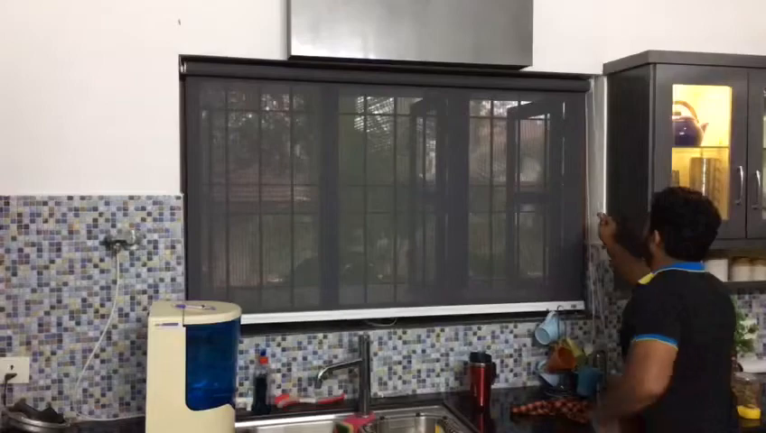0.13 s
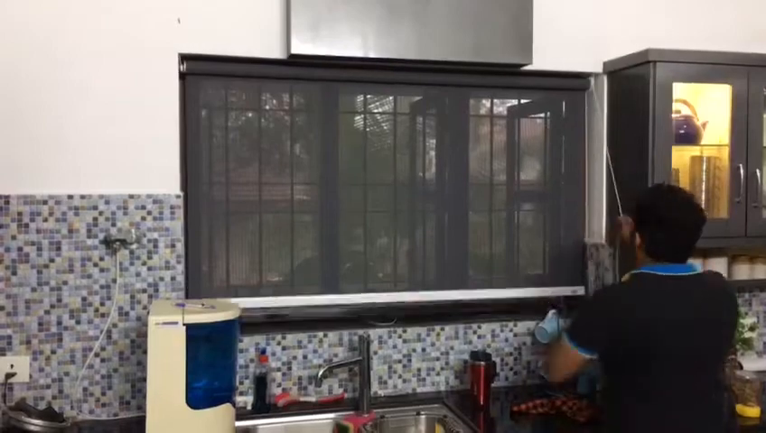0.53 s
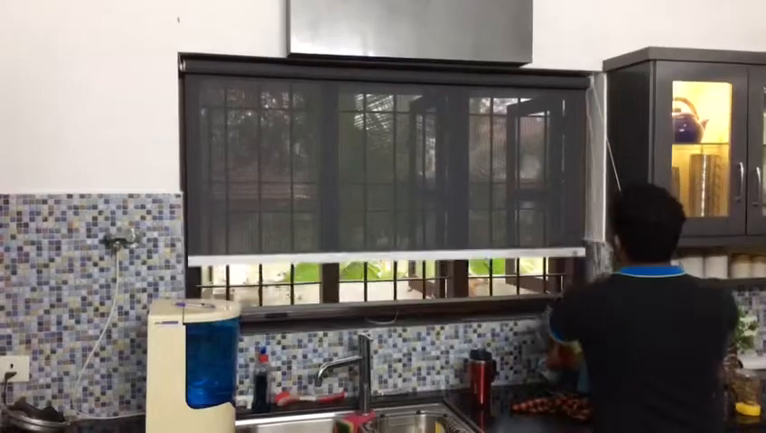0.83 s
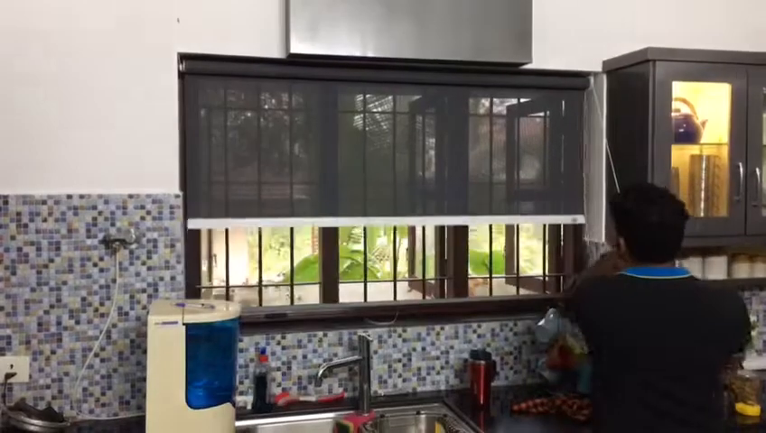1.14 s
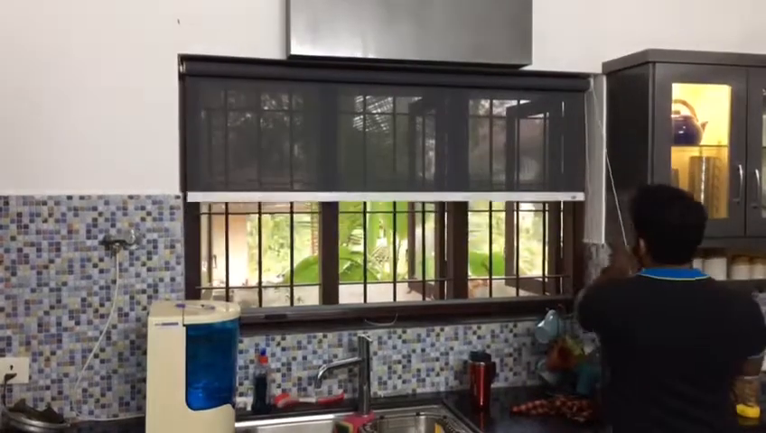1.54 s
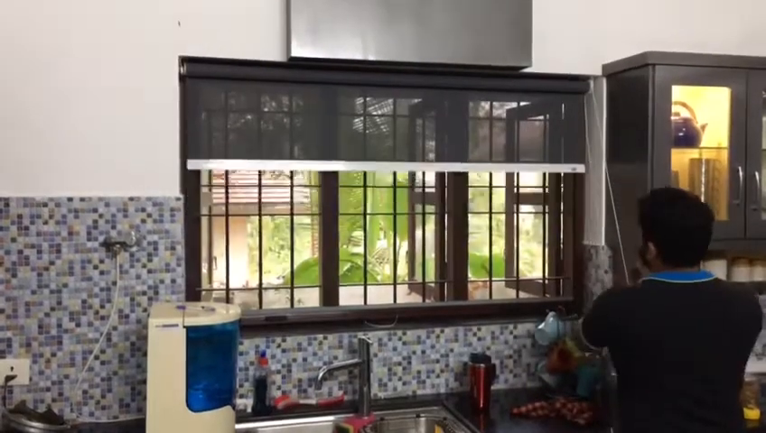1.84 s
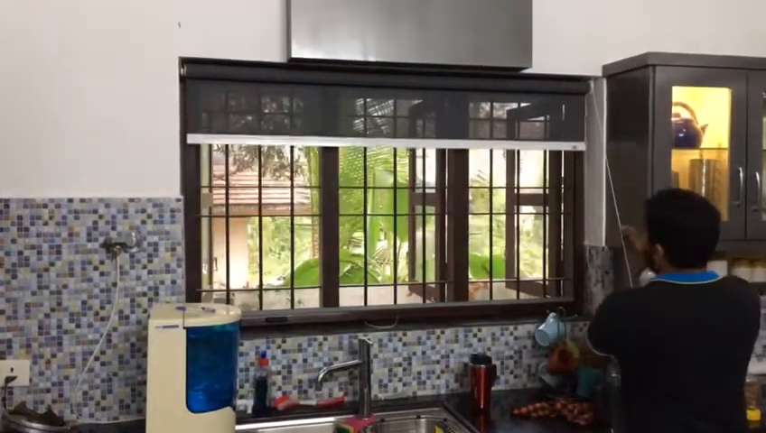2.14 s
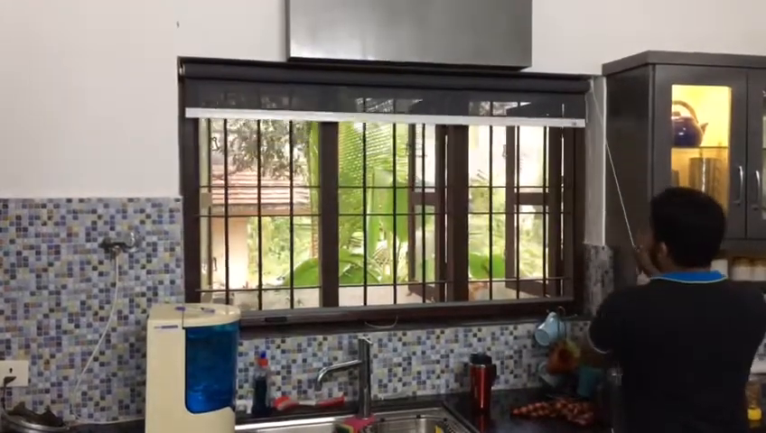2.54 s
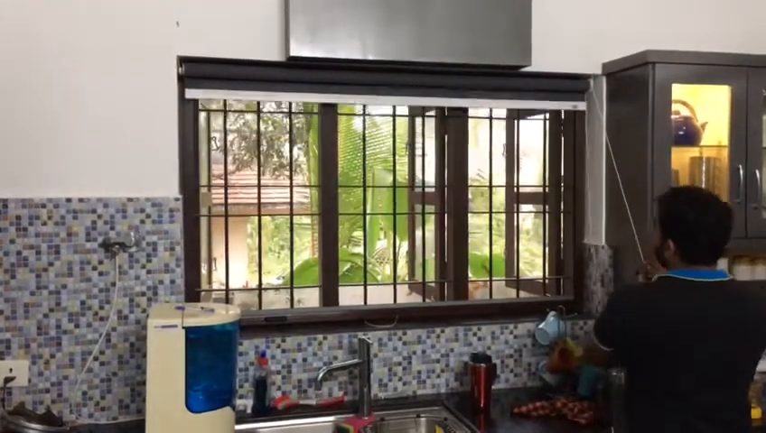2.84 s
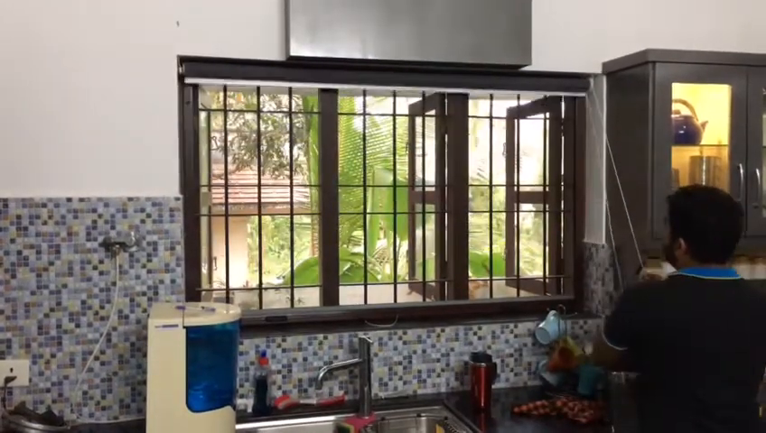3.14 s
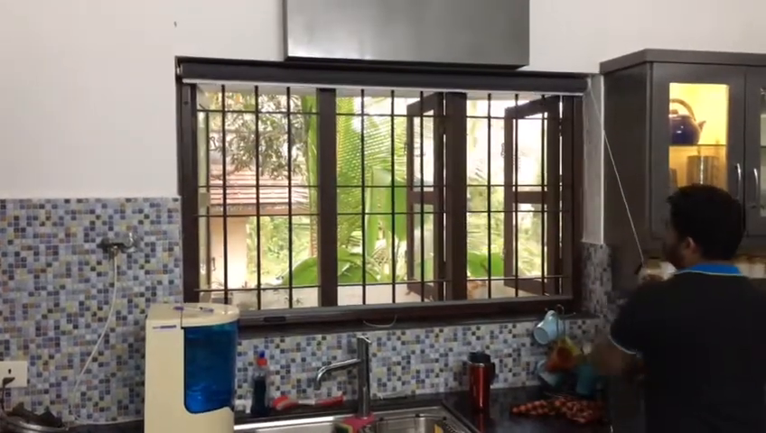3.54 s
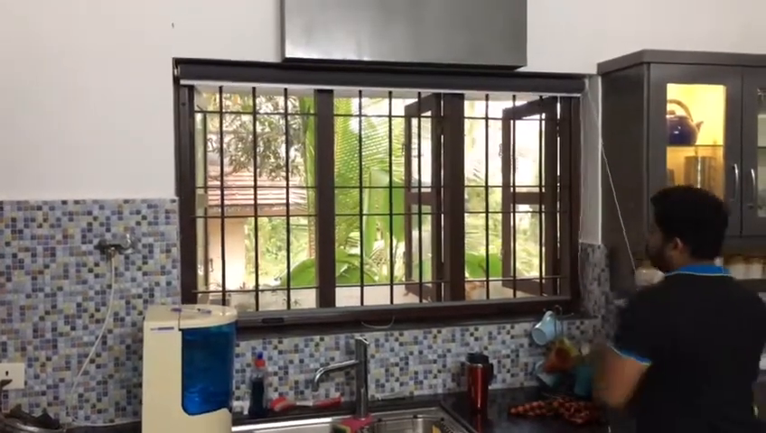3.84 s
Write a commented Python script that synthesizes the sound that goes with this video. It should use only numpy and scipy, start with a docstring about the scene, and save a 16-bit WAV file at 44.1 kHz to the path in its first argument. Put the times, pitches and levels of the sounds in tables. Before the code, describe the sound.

Heard from across an echoing kitchen, a roller blind rises in several pulls with soft rubbing and bead rattles over a steady fan hum. It stops with a sharp, ringing knock, and the loose chain slaps the tiles.

```python
"""A tiled kitchen, one microphone across the room from the window. A fan hums throughout. A roller blind is
hauled up by its bead chain: the roller rubs at each pull and the chain squeaks once, while the beads rattle in
bursts. At 3.2 s the bottom bar knocks against the housing and rings. Half a second later the slack chain swings
into the wall and clinks on a fitting. The hard room rings on behind the knocks and rattles."""
import sys
import numpy as np
from scipy import signal
from scipy.fft import rfft, irfft
from scipy.io import wavfile

SR = 44100
rng = np.random.default_rng(int(sys.argv[2]) if len(sys.argv) > 2 else 0)


def wrap_up_sound(samples):
    """Save the sound to the file named by the first command line argument, as 16-bit audio."""
    columns = np.atleast_2d(samples).T
    # keep every value between -1 and 1, then stretch to whole-number steps
    tamed = np.clip(columns, -1, 1)
    steps = np.round(tamed * 32767).astype(np.int16)
    wavfile.write(sys.argv[1], SR, steps)


N = 176400


def amp(db):
    """Decibels to gain."""
    return 10 ** (np.asarray(db) / 20)


def unit(x):
    """Scale to the energy of one second at full level."""
    return x * np.sqrt(SR / (np.sum(x ** 2) + 1e-18))


def lookup(points, n):
    """A table over log frequency, read at the bins of n samples."""
    hz, value = np.array(points).T
    return np.interp(np.log(np.fft.rfftfreq(n, 1 / SR) + 1), np.log(hz), value)


def through(x, response):
    """Play a sound through a response."""
    return signal.fftconvolve(x, response)[:len(x)]


def colour(x, spectrum, tilt_db=0):
    """Causal filter with the given spectrum, tilted by dB per octave above 500 Hz."""
    half = SR // 2
    octaves = np.log2(np.maximum(np.fft.rfftfreq(SR, 1 / SR), 500) / 500)
    cepstrum = irfft(np.log(amp(lookup(spectrum, SR) + tilt_db * octaves)))
    cepstrum[1:half] *= 2  # fold to minimum phase
    cepstrum[half + 1:] = 0
    return through(x, irfft(np.exp(rfft(cepstrum)))[:half])


def fade(t60):
    """One second of exponential decay."""
    return np.exp(-np.log(1000) * np.arange(SR) / SR / t60)


def burst(t60):
    """Noise that starts at once and dies away."""
    return rng.standard_normal(SR) * fade(t60)


def swell(s, half_width_s):
    """A smooth rise and fall around a moment."""
    return np.exp(-.5 * ((np.arange(N) / SR - s) / half_width_s) ** 2)


def ring(modes):
    """Struck modes, dying away."""
    t = np.arange(SR) / SR
    return unit(sum(amp(db) * fade(t60) * np.sin(2 * np.pi * (hz * t + rng.random()))
                    for hz, db, t60 in modes))


def tone(hz, wander_hz, steps):
    """A sine whose pitch wanders through a number of random steps."""
    wander = np.interp(np.linspace(0, 1, N), np.linspace(0, 1, steps), rng.standard_normal(steps))
    return np.sqrt(2) * np.sin(2 * np.pi * np.cumsum(hz + wander_hz * wander) / SR)


def contacts(n, per_s, scatter_db=0):
    """Impulses at random moments, their strength spread by scatter_db."""
    hits = rng.random(n) < per_s / SR
    strength = amp(scatter_db * rng.standard_normal(n).clip(-2, 2))
    return hits * strength * rng.choice([-1, 1], n)


def add(out, s, x):
    """Mix a sound in at a time."""
    i = int(s * SR)
    out[i:i + len(x)] += x[:max(N - i, 0)]


# Reverberation of the tiled room: band_hz, t60_s
KITCHEN_DECAY = [(250, 0.63), (700, 0.65), (1400, 0.7), (2300, 0.66), (4000, 0.63), (7000, 0.61),
                 (12000, 0.4)]

def kitchen(build_s=.003, direct_db=-7.5):
    """From one spot to the microphone: direct sound, then a dense tail whose treble dies first."""
    noise = rfft(rng.standard_normal(SR))
    tail = np.zeros(SR)
    for hz, t60 in KITCHEN_DECAY:
        band = lookup([(f, float(f == hz)) for f, _ in KITCHEN_DECAY], SR)
        tail += irfft(noise * band, SR) * fade(t60)
    tail *= 1 - np.exp(-np.arange(SR) / SR / build_s)
    tail /= np.linalg.norm(tail)
    tail[0] += amp(direct_db)
    return tail


def window_recess(early_db=-7):
    """From the window recess to the microphone: its quick reflections, plus the kitchen."""
    early = burst(t60=.044)
    both = kitchen() + amp(early_db) * early / np.linalg.norm(early)
    return both / np.linalg.norm(both)


# Room tone, the fan's moving air: freq_hz, density_db
AIR_SPECTRUM = [(20, -22), (35, -23), (45, 2), (58, -8.5), (70, -7), (86, -15), (100, 1.5), (160, 1),
                (280, 4), (370, 2), (470, -3.5), (620, -2.5), (1000, -2.5), (1500, -7.5), (2200, -13.5),
                (3200, -20.5), (4300, -22.5), (6000, -29.5), (9000, -32.5), (12000, -41)]
# The fan's hum lines: pitch_hz, level_db
HUM_LINES = [(55.5, -63), (199.2, -62.5), (300.5, -60.5), (445, -73.5), (608.3, -65.5)]

def fan(air_db=-48.5):
    """Steady rush of air with slightly wandering hum lines."""
    air = colour(rng.standard_normal(N), AIR_SPECTRUM)
    hum = sum(amp(db) * tone(hz, wander_hz=1.32, steps=24) for hz, db in HUM_LINES)
    return amp(air_db) * unit(air) * np.sqrt(N / SR) + hum


# Light ticks of the gear and bar: start_s, level_db
GEAR_TICKS = [(0.153, -87), (1.141, -73), (1.966, -67), (3.111, -65), (3.152, -67.5)]
# One plastic tick: freq_hz, density_db
TICK_SPECTRUM = [(500, 12.5), (1200, -2), (2400, 8), (4200, -2.5), (7000, -5), (12000, -27)]

def ticks():
    """Single light plastic contacts, over in the window recess."""
    out = np.zeros(N)
    tick = unit(colour(window_recess(), TICK_SPECTRUM))
    for s, db in GEAR_TICKS:
        add(out, s, amp(db) * tick)
    return out


# Pulls that turn the roller: middle_s, half_width_s, level_db
ROLLER_PULLS = [(0.578, 0.0097, -48.5), (0.856, 0.017, -49.5), (1.0, 0.079, -62), (1.154, 0.026, -49.5),
                (1.374, 0.099, -62), (1.64, 0.034, -52.5), (1.88, 0.026, -57), (1.983, 0.015, -48.5),
                (2.266, 0.036, -59), (2.477, 0.088, -57.5), (2.737, 0.11, -63), (3.146, 0.033, -45)]
# The tube rubbing in its brackets: freq_hz, density_db
RUB_SPECTRUM = [(300, -23.5), (700, 1), (1200, 6.5), (1700, -2), (2400, -7), (4000, -14.5), (7000, -39.5),
                (12000, -20)]

def roller(squeak_db=-76):
    """The tube rubs in its brackets, swelling with each pull, and the chain squeaks faintly once."""
    effort = sum(amp(db) * swell(s, half_width) for s, half_width, db in ROLLER_PULLS)
    rub = colour(contacts(N, per_s=410), RUB_SPECTRUM)
    squeak = amp(squeak_db) * swell(s=1.32, half_width_s=.06) * tone(hz=3760, wander_hz=88, steps=300)
    return through(rub / rub.std() * effort, window_recess()) + squeak


def rattle(rows, spectrum):
    """Bursts of colliding beads, each reaching the microphone from its own spot along the chain."""
    out, t = np.zeros(N), np.arange(SR) / SR
    for s, length, db, fall_db, tilt_db in rows:
        envelope = (t < length) * amp(-fall_db * np.minimum(t / length, 1))
        hits = contacts(SR, per_s=380, scatter_db=2.5) * envelope
        hits[0] = 1  # every burst opens on a hit
        add(out, s, amp(db) * unit(colour(through(hits, kitchen()), spectrum, tilt_db)))
    return out


# Rattles of the running chain: start_s, length_s, level_db, fall_db, tilt_db_per_octave
CHAIN_RATTLES = [(0.425, 0.11, -86, 0, -4), (0.504, 0.015, -63.5, -11, -4), (.54, 0.14, -61.5, 0, -4.5),
                 (0.821, 0.015, -71, 19, -8), (0.881, 0.39, -72.5, 13, -4), (1.549, .2, -76.5, -4, -11),
                 (1.7727, 0.031, -50, 7, -1), (1.799, 0.061, -65.5, -8, -11.5)]
# Single bead clicks: start_s, level_db
LONE_CLICKS = [(.331, -91), (2.184, -76.5), (2.601, -86)]
# Colliding beads: freq_hz, density_db
BEAD_SPECTRUM = [(800, -51.5), (1800, -12), (2600, -9.5), (3000, -2.5), (4100, -2), (4550, 5.5),
                 (5300, 4.5), (6100, 8.5), (7200, 5.5), (8000, 3.5), (9700, 6), (12000, 2)]

def running_chain():
    """The beads rattle as the chain is hauled, and a few click alone."""
    out = rattle(CHAIN_RATTLES, BEAD_SPECTRUM)
    for s, db in LONE_CLICKS:
        add(out, s, amp(db) * unit(colour(burst(t60=.16), BEAD_SPECTRUM)))
    return out


# Slaps on the wall: start_s, length_s, level_db, fall_db, tilt_db_per_octave
WALL_SLAPS = [(3.75, 0.024, -42, 5, 1.5), (3.78, 0.049, -66, 5, -9), (3.912, 0.019, -59, -3, -2),
              (3.95, 0.048, -61, 2, -1)]
# Beads on tile: freq_hz, density_db
TILE_SPECTRUM = [(800, -32), (1800, -12), (2600, -9), (3400, -5.5), (3800, -9.5), (4300, 1), (5000, -4.5),
                 (5800, 0.5), (6900, -1), (7800, -3), (9600, 3), (10400, 1.5), (11400, -1.5), (12000, -0.5)]
# The chain striking a fitting by the wall: start_s, level_db
FITTING_CLINKS = [(3.7502, -55)]
# Modes of that fitting: pitch_hz, relative_db, t60_s
FITTING_MODES = [(3434, -3, 0.37), (4180, -18, 0.39), (4310, -14.5, 0.62), (5500, -13, 0.28),
                 (5830, -18, 0.29), (6406, -14, 1), (6860, -6.5, 0.29), (7779, -12, 0.3)]

def slack_chain():
    """The loose chain slaps the tiles and sets a fitting ringing."""
    out = rattle(WALL_SLAPS, TILE_SPECTRUM)
    for s, db in FITTING_CLINKS:
        add(out, s, amp(db) * ring(FITTING_MODES))
    return out


# Blows of the bottom bar: start_s, level_db, tilt_db_per_octave
BAR_BLOWS = [(3.2115, -39.5, 1), (3.215, -35, 1), (3.2198, -37, 1), (3.2335, -49, -4)]
# Dense ring of bar and housing: freq_hz, density_db
BAR_SPECTRUM = [(80, -29), (130, -17), (260, -14.5), (420, -22.5), (540, -9), (660, -9), (850, 3),
                (1100, -1), (1400, -3.5), (2000, -0.5), (2400, -1.5), (2750, -8), (3500, -16),
                (4200, -10.5), (5000, -16.5), (7000, -27), (12000, -36.5)]
# Modes of the bar: pitch_hz, relative_db, t60_s
BAR_RING_MODES = [(765, -9, .4), (888, -7, 0.88), (990, -5, .48), (1048, 5, 0.28), (1117, 4, 0.31),
                  (1160, -12, 0.24), (1457, -5, 0.96), (1653, -6, 0.33), (1810, 6, 0.17), (1814, -3, 0.26),
                  (1940, 5, 0.21), (2257, -6.5, 0.72), (2370, -15, 0.24), (2420, -13, 0.27),
                  (3327, -15, 0.32), (4183, -11, .33)]
# Crack of the first blow: freq_hz, density_db
CRACK_SPECTRUM = [(600, -13), (2000, 7.5), (4200, 3.5), (7000, -3.5), (12000, -11.5)]

def bottom_bar(ring_db=-38, crack_db=-44):
    """At the top of the window the bar cracks against the housing, chatters and rings."""
    out = np.zeros(N)
    for s, db, tilt_db in BAR_BLOWS:
        blow = through(burst(t60=.0042), window_recess())
        add(out, s, amp(db) * unit(colour(blow, BAR_SPECTRUM, tilt_db)))
    first_s = BAR_BLOWS[0][0]
    add(out, first_s, amp(ring_db) * ring(BAR_RING_MODES))
    add(out, first_s, amp(crack_db) * unit(colour(burst(t60=.076), CRACK_SPECTRUM)))
    return out


def scene():
    """Everything as heard from across the kitchen, in mono."""
    return (fan() + ticks() + roller() + running_chain() + slack_chain() + bottom_bar())[None]


def record(dry):
    """The microphone opens just after the start and cuts the highest treble."""
    open_s, top_hz = .0726, 11850
    live = np.arange(N) / SR >= open_s
    lowpass = signal.ellip(10, .2, 80, top_hz, fs=SR, output="sos")
    return signal.sosfilt(lowpass, dry * live)


dry = scene()
out = record(dry)
wrap_up_sound(out)
```